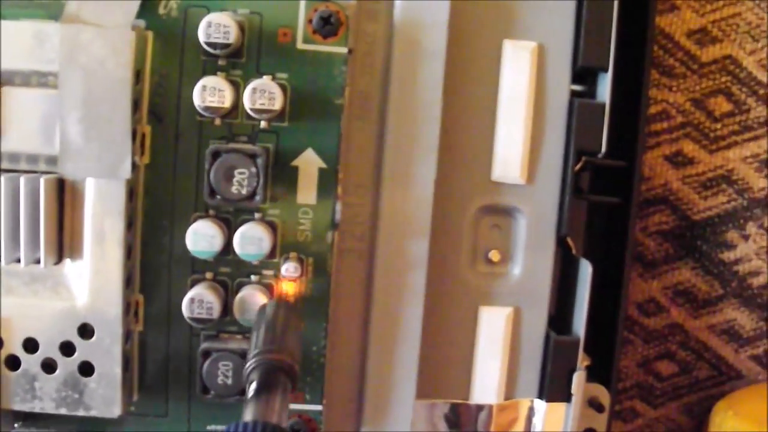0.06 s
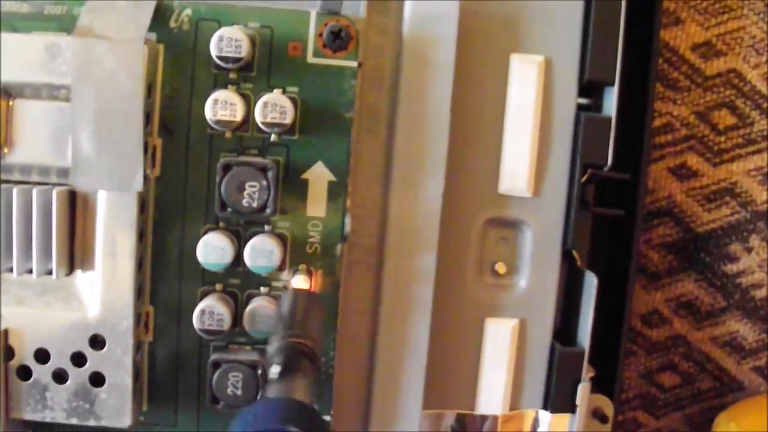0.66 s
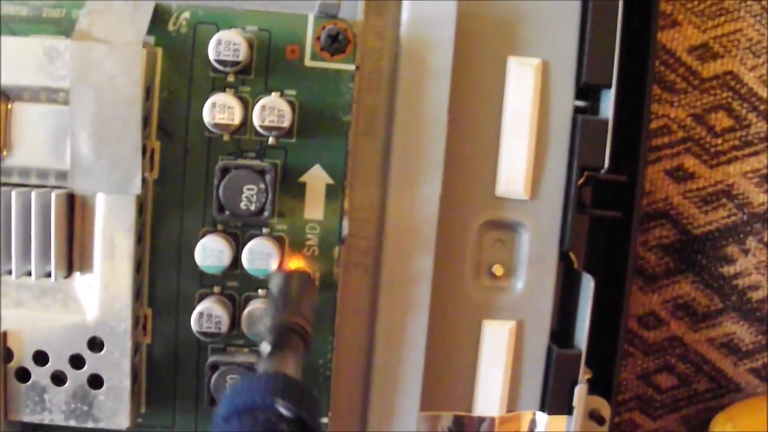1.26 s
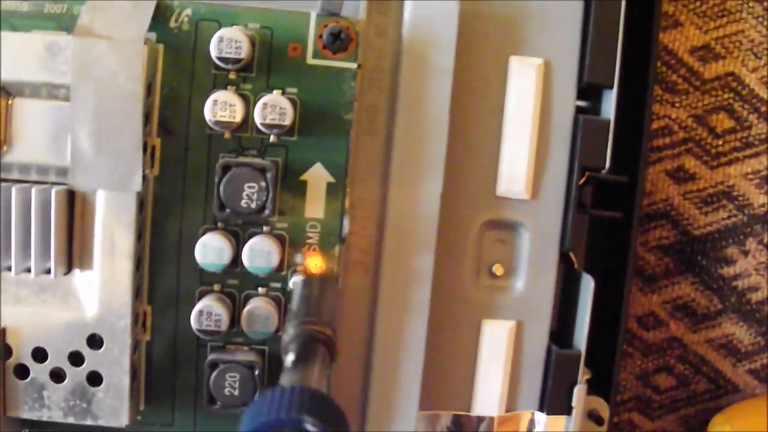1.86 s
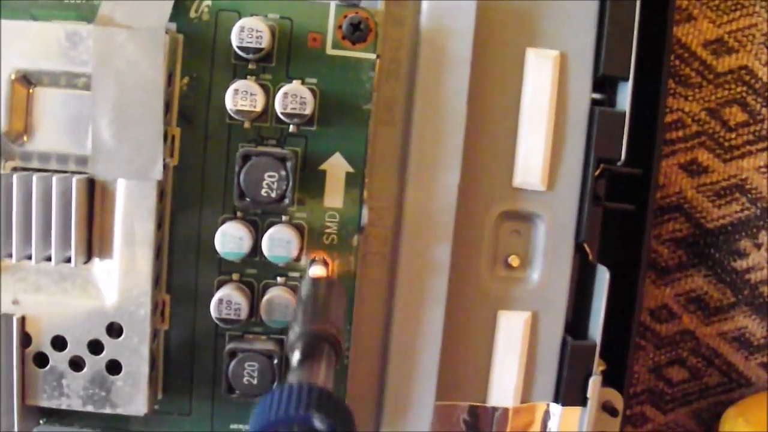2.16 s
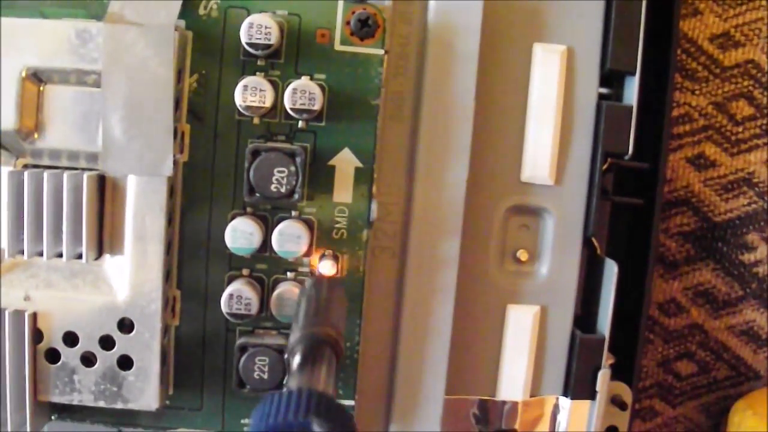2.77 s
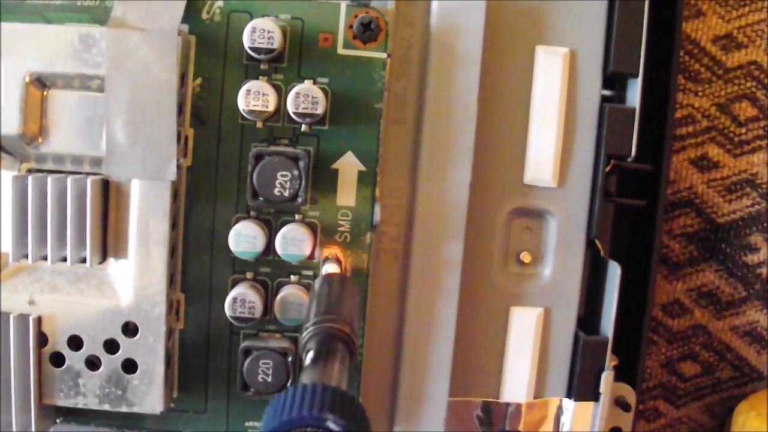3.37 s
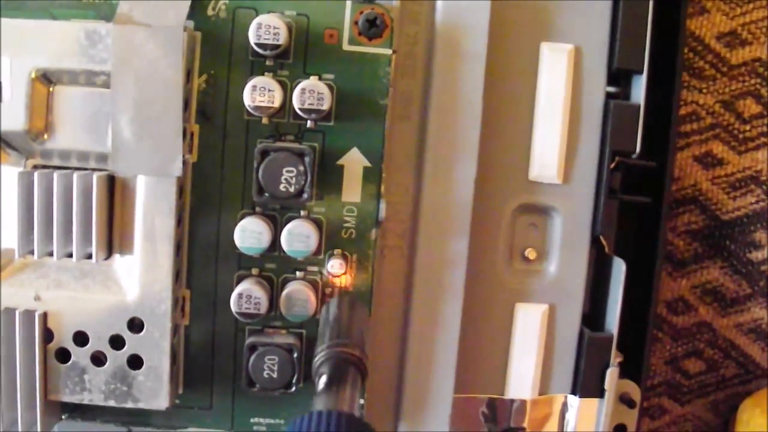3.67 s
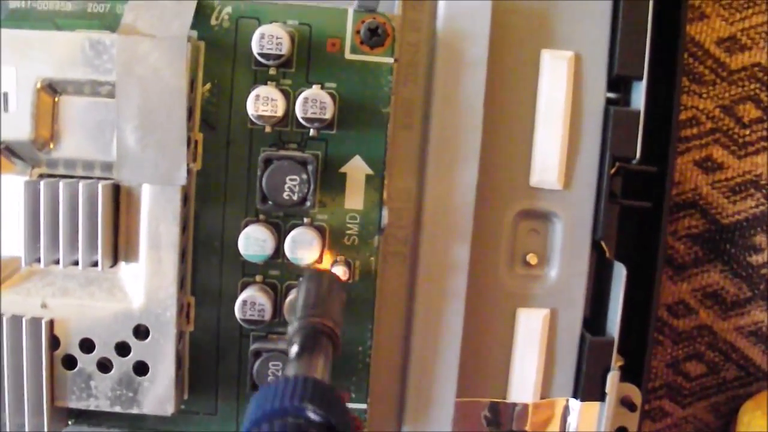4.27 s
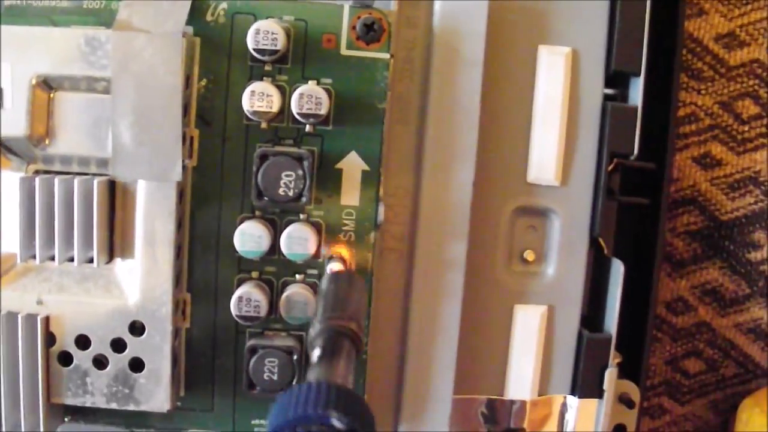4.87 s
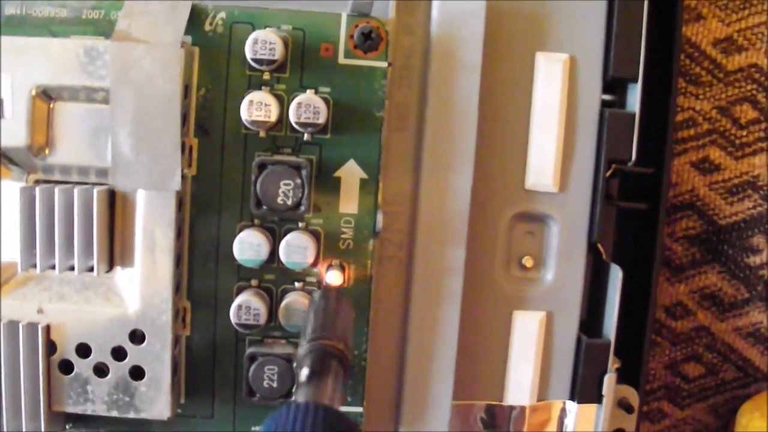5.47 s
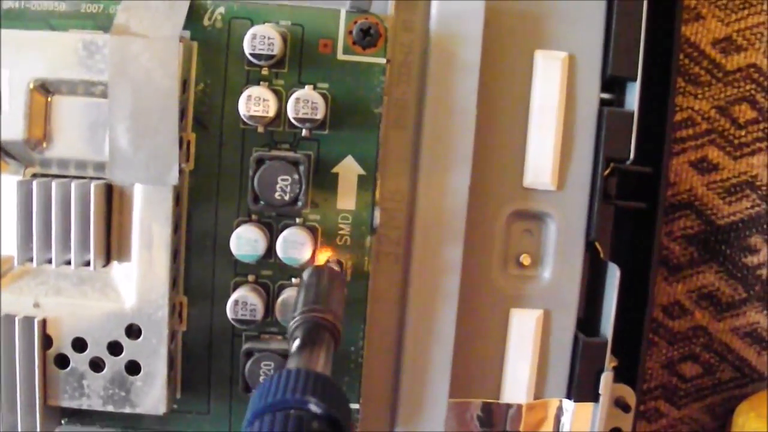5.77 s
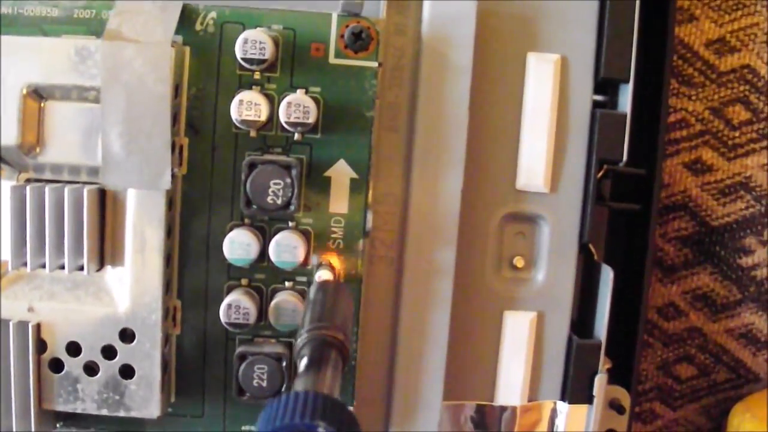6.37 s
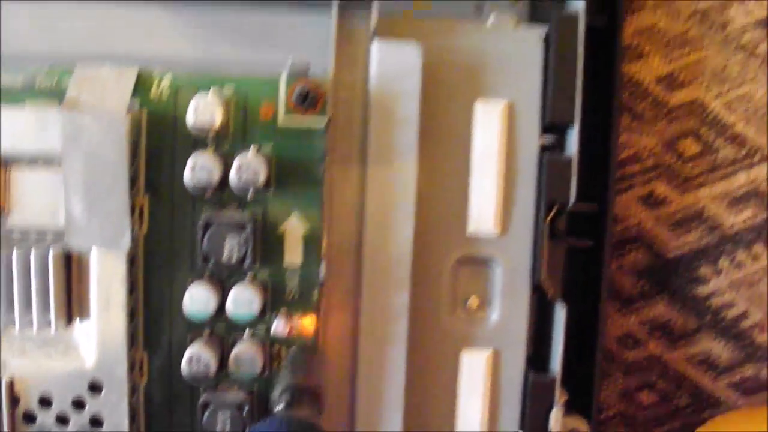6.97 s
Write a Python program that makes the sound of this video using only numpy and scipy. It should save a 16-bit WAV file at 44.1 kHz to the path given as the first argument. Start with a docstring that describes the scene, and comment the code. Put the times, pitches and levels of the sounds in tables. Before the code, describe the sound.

A gas hot air gun hisses steadily over a circuit board at a workbench. Where the jet hits the board, a bright, almost whistling hiss swells and shifts about twice a second as the nozzle circles, then turns airier as it lifts away at the end. The close, hand-held camera adds a few soft finger bumps and three runs of faint focusing ticks over a low room hum.

```python
"""At a workbench in a quiet, humming room, a gas hot air gun hisses over a circuit board.
Burning gas rushes through its tube and the jet of air rings in the nozzle. Where the air hits the
board, bright bands of hiss swell and shift as the nozzle circles a part and then lifts away.
Close by, a hand-held camera gives a few soft bumps as fingers move on it, and three runs of
soft ticks, probably its lens focusing."""
import sys
import numpy as np
from scipy import signal
from scipy.fft import rfft, irfft, next_fast_len
from scipy.io import wavfile
from scipy.ndimage import uniform_filter1d, map_coordinates

SR = 44100
rng = np.random.default_rng(int(sys.argv[2]) if len(sys.argv) > 2 else 0)


def store_pcm(level_fs):
    """Save levels as 16-bit WAV."""
    pcm = np.round(np.clip(level_fs, -1, 1) * 32767).astype(np.int16)
    wavfile.write(sys.argv[1], SR, np.atleast_2d(pcm).T)


N = 317961

# A noise's colour says how strong its low and high pitches are compared with each other.
# colours of the room's rumble, a finger's thud and a finger's rub: f/Hz, level/dB
ROOM_COLOUR = [(15, -5.5), (28, -2.5), (42, -4.5), (60, -6), (85, -6), (150, -8), (270, -12), (400, -12.5),
               (700, -16.5), (2000, -41)]
THUD_COLOUR = [(20, -4), (60, 2.5), (120, -4), (200, -11), (320, -7), (500, -44)]
RUB_COLOUR = [(70, -25), (160, -4.5), (230, 3.5), (300, -3), (400, -10.5), (650, -16), (950, -9),
              (1600, -19), (4000, -40)]
# tones of the room's hum: f/Hz, level/dB
HUM_TONES = [(29.5, -63), (59, -72.5), (226, -69.5)]
# finger bumps: t/s, width/s, thud level/dB, rub level/dB
BUMPS = [(0.598, .06, -58, -72), (.748, 0.045, -49, -61), (1.59, 0.096, -74, -54.5),
         (2.87, 0.012, -64, -47.5), (2.908, .022, -68, -52), (5.76, 0.074, -61, -60)]
# lens steps: t/s, relative click level/dB, relative thump level/dB
LENS_STEPS = [(1.3035, -26, -53.5), (1.3972, -28.5, -55), (1.497, -30.5, -50), (1.5953, -34, -54),
              (1.6685, -36, -53), (1.734, -28, -50), (1.796, -24.5, -46.5), (2.2485, -29, -46.5),
              (2.3495, -25, -52), (2.4418, -24, -50), (2.555, -26, -45), (3.8028, -25, -48),
              (3.903, -31, -48.5), (3.9958, -30, -51.5), (4.1046, -25, -51)]
# colours of a step's bright click and of the dull tick before it: f/Hz, level/dB
CLICK_COLOUR = [(800, -24.5), (2400, -11), (2750, -18), (3050, 4.5), (3400, 3.5), (4000, -8.5),
                (5200, -14.5), (6500, -24), (12000, -45)]
DULL_TICK_COLOUR = [(200, -6), (520, -12), (700, -24), (880, -7), (990, -2), (1250, -10), (1500, -8.5),
                    (2500, -10.5), (5000, -28)]
# tones the camera body rings with: f/Hz, relative level/dB, time to fade by 60 dB/s
BODY_TONES = [(246, 4, .075), (296, -2, 0.058)]

# the gas flow slowly settles: t/s, burner level/dB, nozzle level/dB
GAS_FLOW = [(0, -41.5, -42.5), (.27, -42.5, -40), (.53, -43, -42), (1.27, -43, -40.5), (2.05, -44, -42),
            (2.4, -43.5, -42.5), (2.75, -44, -42), (3.7, -44.6, -42.5), (4.3, -43.5, -41.5),
            (5.4, -45.2, -43), (5.8, -43.5, -40.5), (6.05, -45.5, -41.5), (6.37, -43.5, -42),
            (6.75, -44.6, -41.5)]
# colour of the swirling gas in the burner: f/Hz, level/dB
RUSH_COLOUR = [(100, -16), (400, -5), (800, -5.5), (1400, -1), (2500, 0), (5000, 0.5), (5650, -0.5),
               (7000, -5), (9400, 2), (11400, -7.5), (13500, -4), (15000, -24)]
# bands of hiss in the burner tube, in the nozzle, in open air and scattered around the bench:
# f/Hz, width/Hz, relative level/dB
TUBE_BANDS = [(830, 134, -17), (1192, 150, -15), (1674, 237, -6.5), (2040, 170, -10), (2340, 280, -3),
              (2645, 260, -2.5), (3027, 230, 1.5), (3390, 365, 1), (3715, 274, -1.5), (4134, 380, -5),
              (4540, 250, -11), (5210, 390, -12)]
NOZZLE_BANDS = [(6076, 276, -1.5), (6405, 590, -2.5), (6867, 570, 1), (9795, 450, -6), (10400, 590, -15),
                (12830, 790, -9)]
OPEN_AIR_BANDS = [(5700, 540, -11.5), (9050, 800, -0.5)]
SCATTER_BANDS = [(3780, 290, -1.5), (6660, 1900, 0), (8200, 1300, 1), (9800, 700, -7), (13000, 1600, -15)]
# where the jet points: t/s, aim (0 beside the part, 1 on it), boost of the air hitting the board/dB
AIM = [(0, 0, 0.5), (1.7, 0.046, 0), (2.1, .25, -1.5), (2.26, 1, 0), (3.7, 1, 0), (4.6, 1, 1.5),
       (5.62, 0.97, 1.2), (5.88, 0, 1), (6.08, 0.9, 1.8)]
# sweeps over the part, about two a second: t/s, length/s, centre band swell/dB, side band swell/dB
SWEEPS = [(0.018, .35, 4.5, -5), (0.632, .2, 4.5, -5), (1.08, .25, 3, 1), (1.369, 0.33, 2.5, 4),
          (1.651, .2, 3, -0.5), (2.39, 0.51, 9, 5), (2.852, 0.53, 8, 3.5), (3.397, 0.34, 7, 4),
          (3.922, .32, 6, 0.5), (4.35, 0.43, 6, 4), (4.81, 0.41, 5, 3), (5.206, .48, 6.5, 4.5),
          (5.56, .26, 2, 3), (6.18, .44, 4.3, -0.5), (6.61, .44, 5, 3), (7.17, .34, -1, 12)]
# three bands of air hitting the board, with the nozzle beside the part, on it and lifted clear:
# f/Hz beside, on, clear, then starting level/dB beside, on, clear
CENTRE_BAND = (8370, 8070, 8340.5, -47, -47.5, -40)
LOWER_BAND = (7480, 7609.5, 7650, -44.5, -46.5, -58)
UPPER_BAND = (8660, 8700, 9030, -47.5, -46.5, -50)
# a thin whistle, compared with the centre band: level/dB beside, on, clear
WHISTLE_LEVELS = (-1.6, -5, -5)
# echoes off the chassis and bench: delay/s, level/dB
ECHOES = [(.00325, -34), (.00385, -31), (.0046, -35), (.0059, -20), (.0067, -29.5), (0.0129, -31)]
# how far the left microphone is ahead of the right (negative means behind): f/Hz, phase/rad
LEFT_LEAD = [(2200, 0), (3400, -.5), (5000, -.42), (6000, -.8), (8000, -1.12), (10600, -1.5), (13000, -1.9),
             (15000, -2.5)]

LIFT_AT_S, LIFT_TAKES_S = 6.74, 0.12  # the nozzle lifts off the board
OPEN_AIR_RISE_S = 0.22  # the open-air sound takes a little longer to come in


def amp(db):
    """Turn decibels into a number to multiply by."""
    return 10 ** (np.asarray(db) / 20)


def unit(x):
    """Scale a signal to an average strength (rms) of 1."""
    return x / np.sqrt(np.mean(np.abs(x) ** 2) + 1e-20)


def along(points, hz):
    """Read a table of f/Hz and value, joining its points on a log frequency scale."""
    freqs, values = np.transpose(points)
    return np.interp(np.log(hz + 1), np.log(freqs + 1), values)


def curves(rows):
    """Turn each column after the time into a curve with one value per sample."""
    times, *columns = np.transpose(rows)
    return [np.interp(np.arange(N) / SR, times, column) for column in columns]


def wobble(per_s):
    """A smooth curve through per_s random values a second."""
    times = np.linspace(0, N / SR, num=2048)
    values = map_coordinates(rng.standard_normal(len(times)), [times * per_s], mode="wrap")
    return np.interp(np.arange(N) / SR, times, values)


def filtered(x, response):
    """Multiply each frequency in x by response(hz)."""
    size = next_fast_len(N + SR // 2)
    return irfft(rfft(x, size) * response(np.fft.rfftfreq(size, 1 / SR)), size)[..., :N]


def noise(colour):
    """Noise of strength 1 with the given colour."""
    return unit(filtered(rng.standard_normal(N), lambda hz: amp(along(colour, hz))))


def hump(offset_hz, width_hz):
    """A steep-sided hump that lets through the pitches near its middle."""
    return 1 / np.sqrt(1 + (2 * offset_hz / width_hz) ** 4)


def fixed_hiss(bands):
    """Swirling air ringing in bands that stay put, at strength 1."""
    def gain(hz):
        return np.sqrt(sum((amp(db) * hump(hz - centre, width)) ** 2 for centre, width, db in bands))
    return unit(filtered(rng.standard_normal(N), gain))


def moving_hiss(centre_hz, width_hz):
    """Swirling air ringing in one band whose pitch can move, at strength 1."""
    a, b = filtered(rng.standard_normal((2, N)), lambda hz: hump(hz, width_hz))
    phase = 2 * np.pi * np.cumsum(centre_hz) / SR
    return unit(a * np.cos(phase) + b * np.sin(phase))


def burst(t, rise_s, fade_s):
    """A quick swell that peaks at t = 0, then drops 60 dB in fade_s."""
    return np.where(t < 0, np.exp(-np.abs(t) / rise_s), amp(-60 * np.abs(t) / fade_s))


def patchy(x, depth_db):
    """Swirling gas drifts in colour: random patches a few hundred Hz wide and about 0.1 s long."""
    spectrum = signal.stft(x, nperseg=512)[2]
    patches = uniform_filter1d(rng.standard_normal(spectrum.shape), size=5, axis=0)
    patches = uniform_filter1d(patches, size=22, axis=1)
    return signal.istft(spectrum * amp(depth_db * unit(patches)), nperseg=512)[1][:N]


def lifted(takes_s):
    """0 while the nozzle is near the board, rising to 1 as it lifts clear."""
    return np.clip((np.arange(N) / SR - LIFT_AT_S) / takes_s, 0, 1)


def aimed(beside, on, clear):
    """Slide between three values as the nozzle is beside the part, on it or lifted clear."""
    on_part, _ = curves(AIM)
    near = beside + (on - beside) * on_part
    return near + (clear - near) * lifted(LIFT_TAKES_S)


def sweep_swells():
    """Each sweep of the hand is one smooth arch, in dB, for the centre band and the side bands."""
    t = np.arange(N) / SR
    return sum(np.outer([centre_db, side_db], np.cos(np.pi * np.clip((t - at) / length, -0.5, 0.5)))
               for at, length, centre_db, side_db in SWEEPS)


def room():
    """A low rumble and a slightly wavering hum."""
    hum = np.zeros(N)
    for hz, db in HUM_TONES:
        wavering_hz = hz + 1.193 * wobble(per_s=5)
        hum += amp(db) * np.sqrt(2) * np.sin(2 * np.pi * np.cumsum(wavering_hz) / SR)
    return hum + amp(-59.5) * noise(ROOM_COLOUR)


def finger_bumps():
    """Fingers shift on the camera: a low thud with a soft rub."""
    t = np.arange(N) / SR
    thud, rub = noise(THUD_COLOUR), noise(RUB_COLOUR)
    return sum(np.exp(-0.5 * ((t - at) / width) ** 2) * (amp(thud_db) * thud + amp(rub_db) * rub)
               for at, width, thud_db, rub_db in BUMPS)


def lens_ticks():
    """Each lens step starts with a dull tick, thumps the camera body and stops with a click."""
    out = np.zeros(N)
    before = SR // 40
    t = np.arange(-before, SR // 8) / SR
    bright, dull = noise(CLICK_COLOUR), noise(DULL_TICK_COLOUR)
    for at, click_db, thump_db in LENS_STEPS:
        span = round(at * SR) - before + np.arange(len(t))
        start = burst(t + 0.00955, rise_s=0.00087, fade_s=0.018)
        stop = burst(t - 0.003, rise_s=0.0028, fade_s=0.075)
        tick = amp(-57.5) * unit((start + 0.66 * stop) * dull[span])
        age = np.maximum(t + 0.00683, 0)
        detune = 1 + 0.041 * rng.standard_normal()  # the grip changes how the body rings
        ring = sum(amp(db - 60 * age / fade_s) * np.sin(2 * np.pi * hz * detune * age)
                   for hz, db, fade_s in BODY_TONES)
        thump = amp(thump_db - 11) * unit(ring * (1 - np.exp(-age / 0.0038)))
        snap = burst(t - 0.002, rise_s=0.0021, fade_s=0.022)
        click = amp(click_db - 23.3) * unit(snap * bright[span])
        out[span] += tick + thump + click
    return out


def scattered_hiss():
    """A faint, high hiss that differs between left and right, giving the sound width."""
    hiss = amp(-54.5) * fixed_hiss(SCATTER_BANDS)
    return filtered(hiss, lambda hz: 1 / (1 + (2400 / (hz + 1)) ** 10))


def bench_echoes(x):
    """Add weak nearby echoes, which put a fine ripple on the colour of the hiss."""
    def response(hz):
        return 1 + sum(amp(db) * np.exp(-2j * np.pi * hz * delay) for delay, db in ECHOES)
    return filtered(x, response)


def burner():
    """Burning gas rushes through the tube; clear of the board it rings less and rushes more."""
    burner_db, _ = curves(GAS_FLOW)
    lift = lifted(OPEN_AIR_RISE_S)
    tube = amp(0.03 - 0.66 * lift) * fixed_hiss(TUBE_BANDS)
    rush = amp(-6 + 1.7 * lift) * noise(RUSH_COLOUR)
    return amp(burner_db + 0.46 * wobble(per_s=25)) * patchy(tube + rush, depth_db=0.84)


def air_on_board():
    """Air hitting the board rings in the gap under the nozzle, swelling with each sweep of the hand."""
    on_part, boost_db = curves(AIM)
    swell_db, side_db = sweep_swells()
    sag_hz = 32 * swell_db * (1 - on_part)  # beside the part, the band sinks as it swells
    glide_hz = 850 * np.maximum(np.arange(N) / SR - LIFT_AT_S, 0)  # a widening gap lowers the pitch
    hand_shake_hz = 25.02 * wobble(per_s=9)
    centre_hz = aimed(*CENTRE_BAND[:3]) - sag_hz - glide_hz + hand_shake_hz
    centre_db = aimed(*CENTRE_BAND[3:]) + swell_db
    centre = amp(centre_db) * moving_hiss(centre_hz, width_hz=480)
    whistle_db = centre_db + aimed(*WHISTLE_LEVELS) + 1.1 * wobble(per_s=15)
    whistle = amp(whistle_db) * moving_hiss(centre_hz + 75, width_hz=100)  # the gap almost sings
    lower_db = aimed(*LOWER_BAND[3:]) + side_db
    lower = amp(lower_db) * moving_hiss(aimed(*LOWER_BAND[:3]), width_hz=410)
    upper_db = aimed(*UPPER_BAND[3:]) + 0.48 * side_db
    upper = amp(upper_db) * moving_hiss(aimed(*UPPER_BAND[:3]), width_hz=400)
    unsteady_flow_db = 0.3 * wobble(per_s=22)
    return amp(boost_db + unsteady_flow_db) * (centre + whistle + lower + upper)


def jet():
    """The jet rings in the nozzle and hits the board; lifted, it rings less and spreads into open air."""
    _, nozzle_db = curves(GAS_FLOW)
    nozzle = amp(nozzle_db - 4 * lifted(LIFT_TAKES_S)) * fixed_hiss(NOZZLE_BANDS)
    open_air = lifted(OPEN_AIR_RISE_S) * amp(-45.5) * fixed_hiss(OPEN_AIR_BANDS)
    return amp(0.31 * wobble(per_s=40)) * (nozzle + air_on_board() + open_air)


def scene():
    """Mix in stereo: high pitches reach the right side first; scattered hiss differs between sides."""
    direct = room() + finger_bumps() + lens_ticks() + bench_echoes(burner() + jet())
    stereo = filtered(direct, lambda hz: np.exp(0.5j * np.outer([1, -1], along(LEFT_LEAD, hz))))
    return stereo + np.outer([1, -1], scattered_hiss())


def record(dry):
    """Cut away everything above 14900 Hz."""
    return filtered(dry, lambda hz: hz < 14900)


dry = scene()
out = record(dry)
store_pcm(out)
```